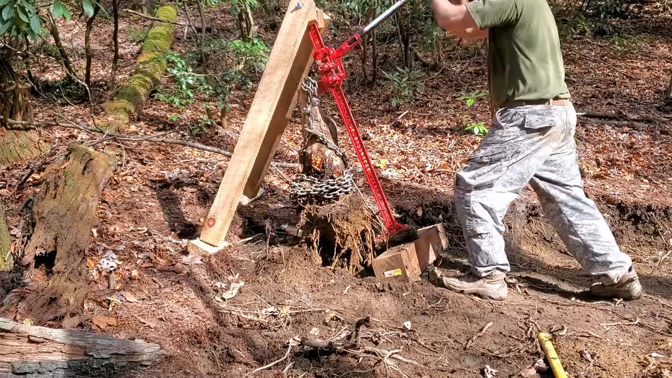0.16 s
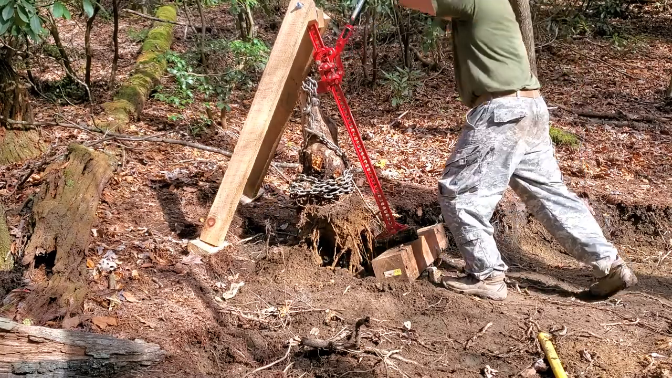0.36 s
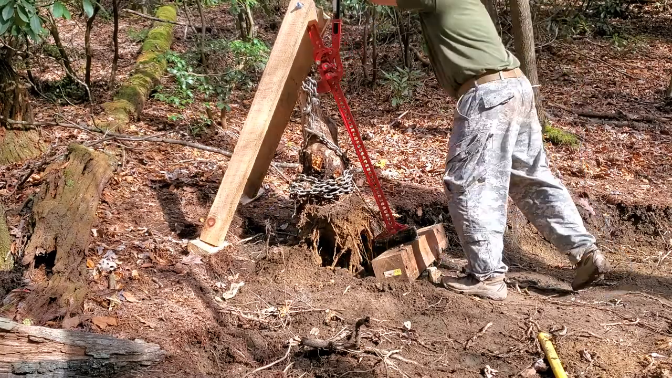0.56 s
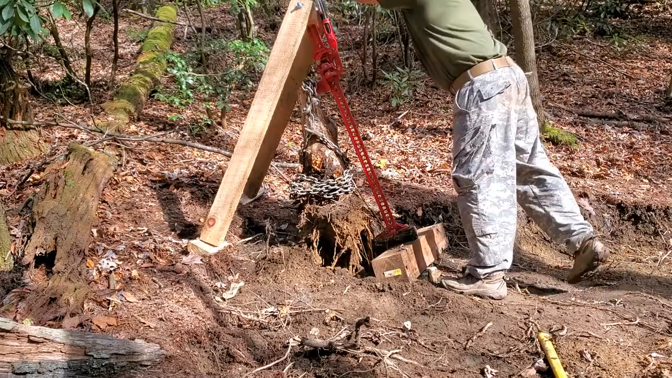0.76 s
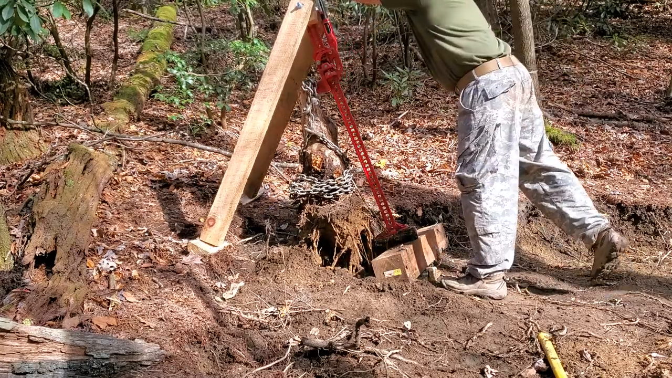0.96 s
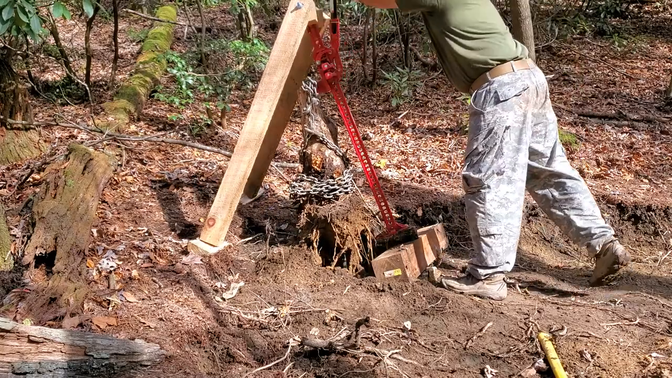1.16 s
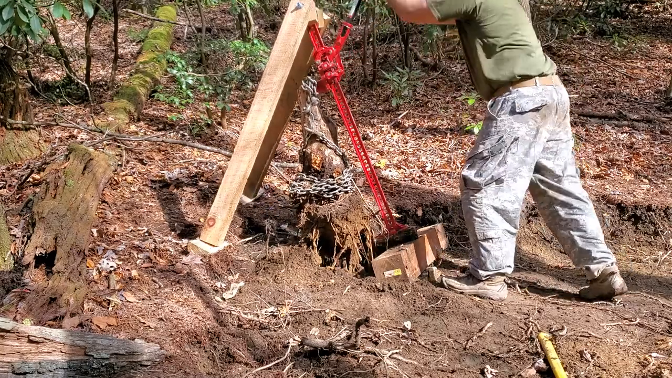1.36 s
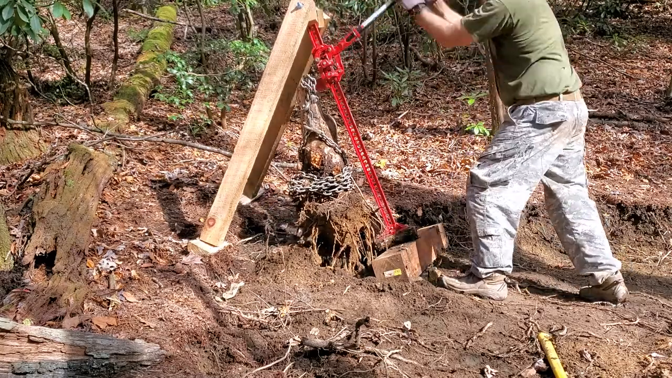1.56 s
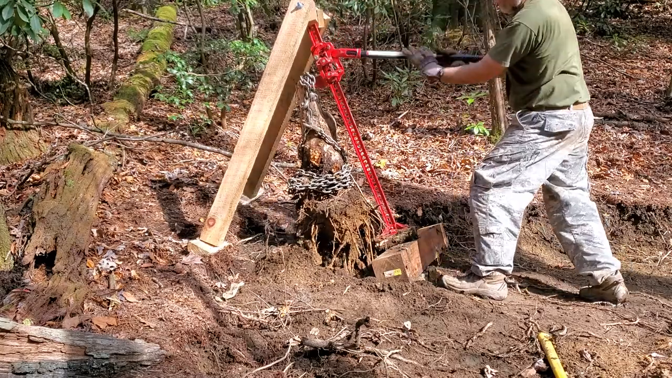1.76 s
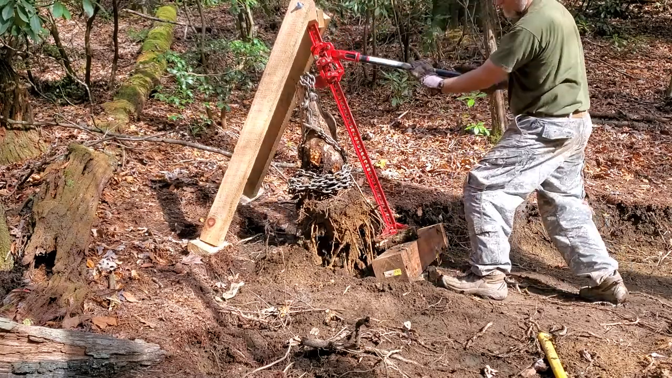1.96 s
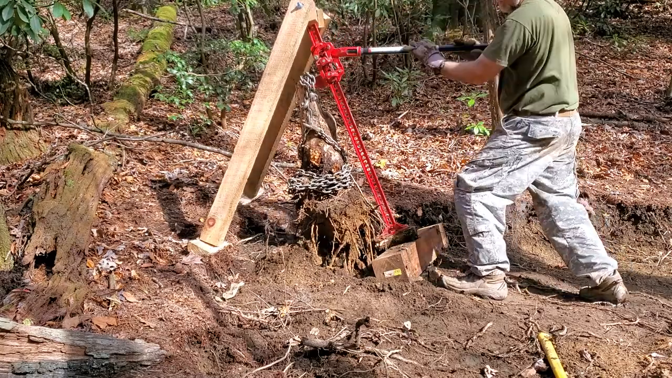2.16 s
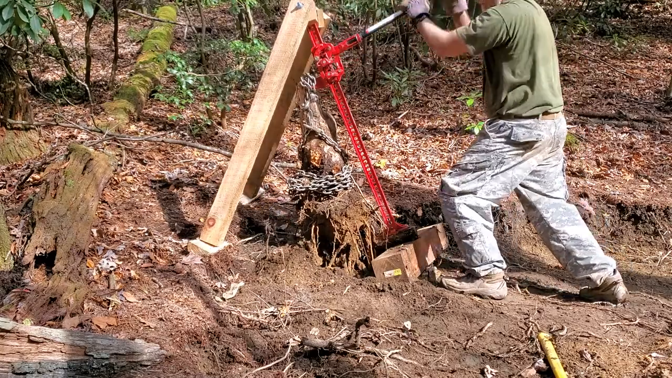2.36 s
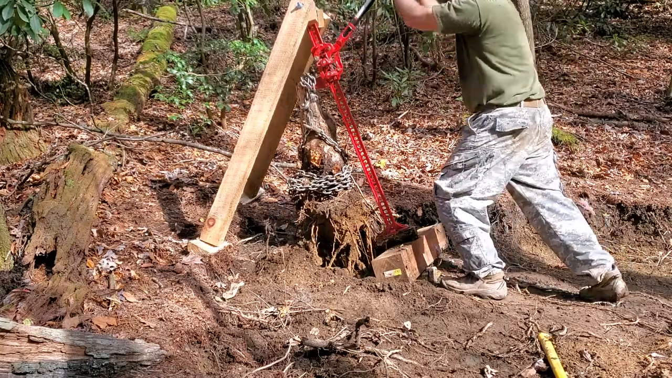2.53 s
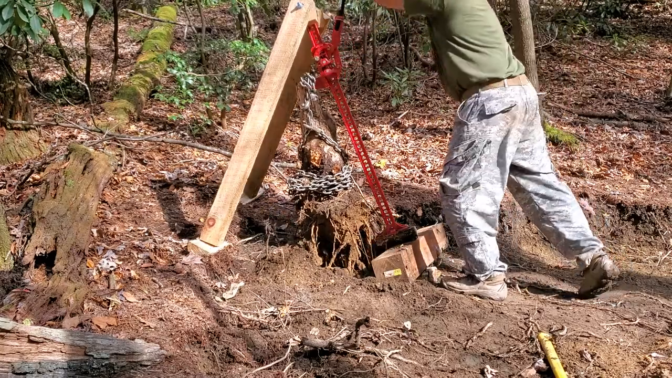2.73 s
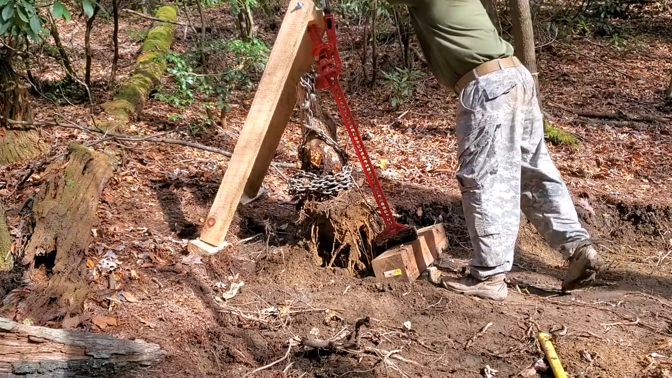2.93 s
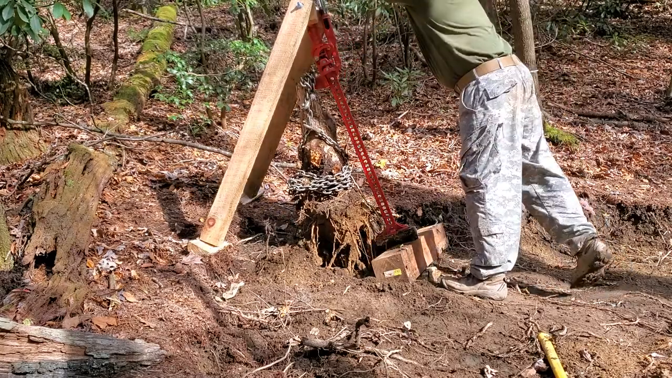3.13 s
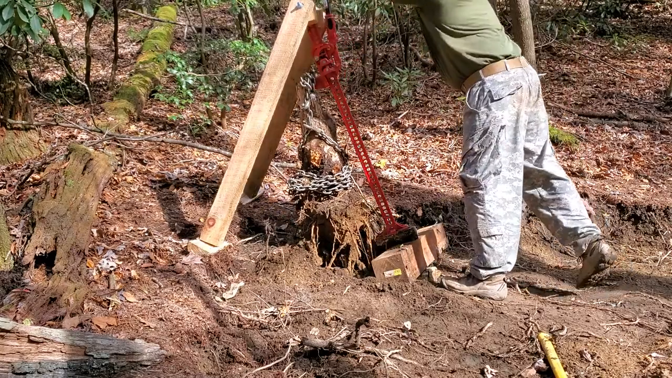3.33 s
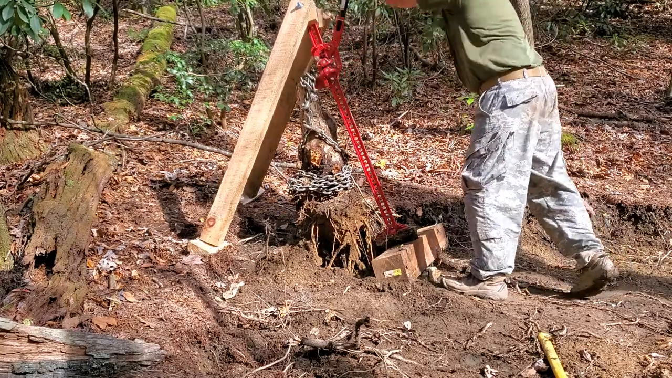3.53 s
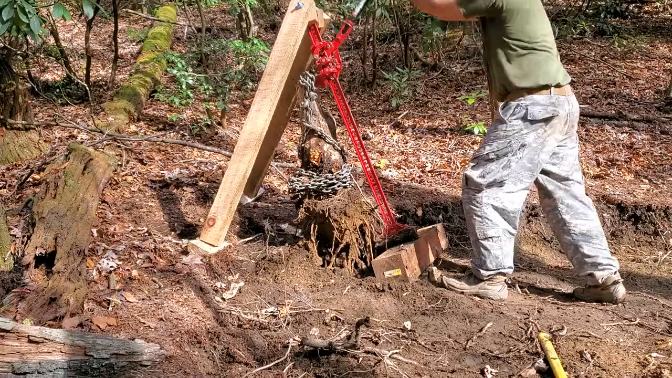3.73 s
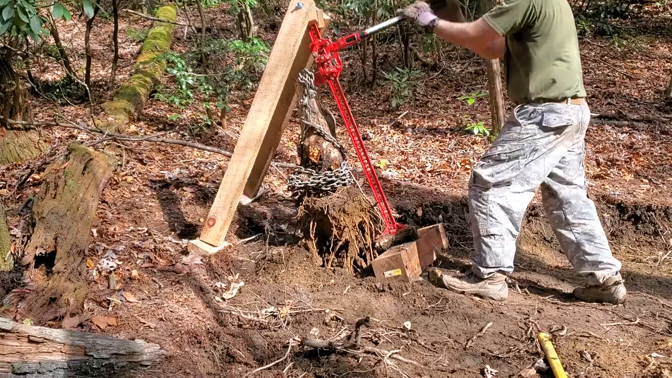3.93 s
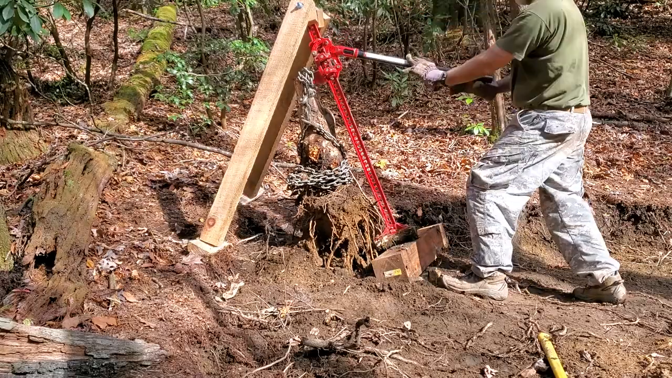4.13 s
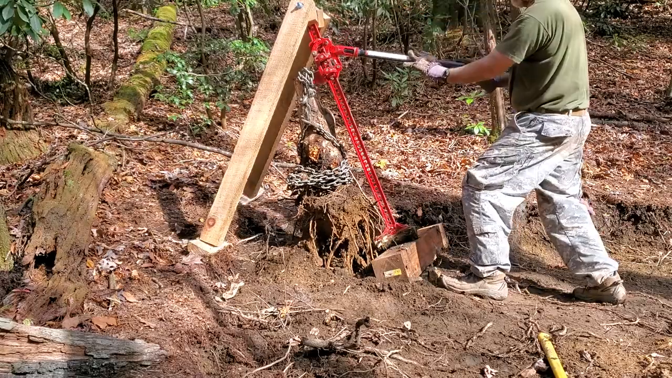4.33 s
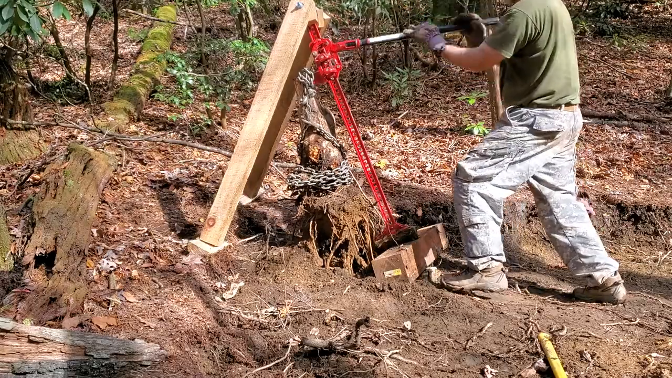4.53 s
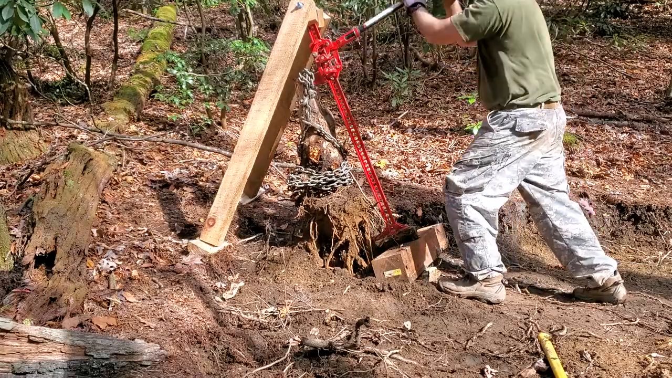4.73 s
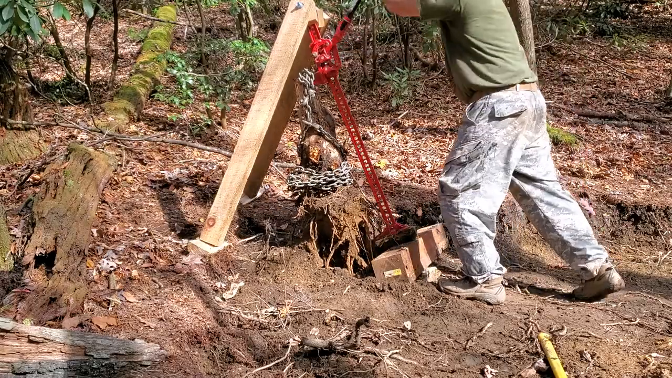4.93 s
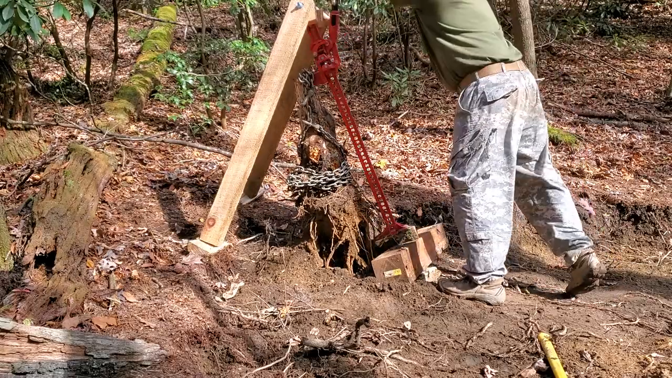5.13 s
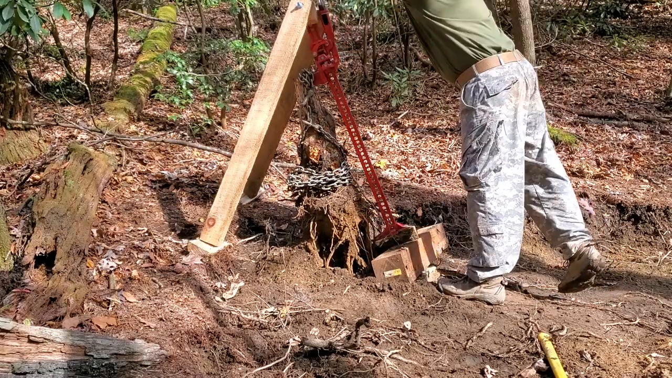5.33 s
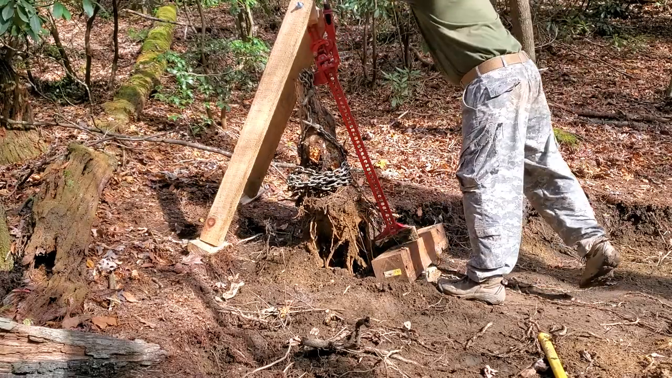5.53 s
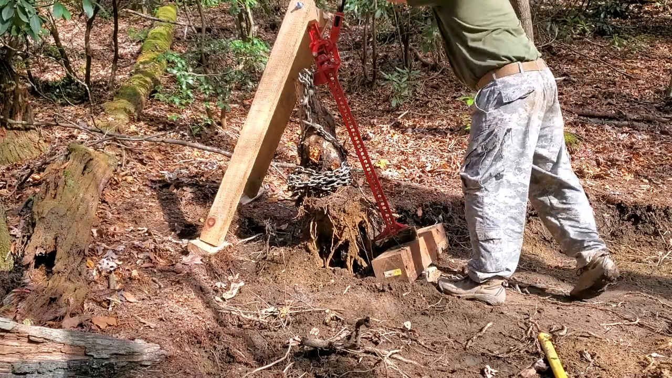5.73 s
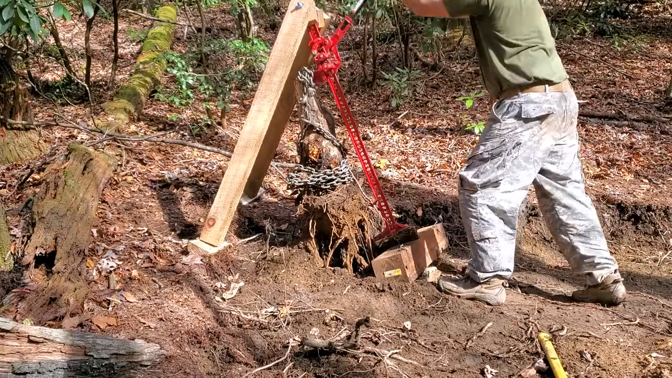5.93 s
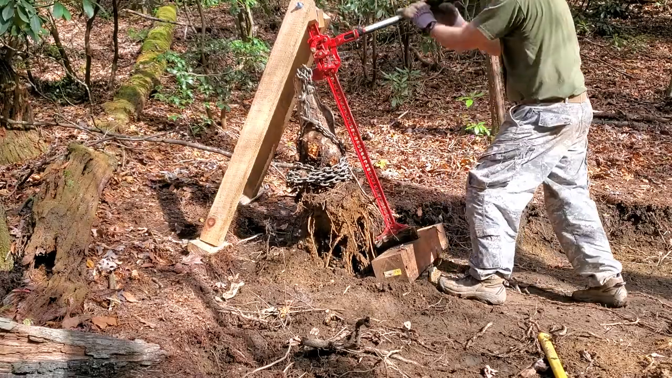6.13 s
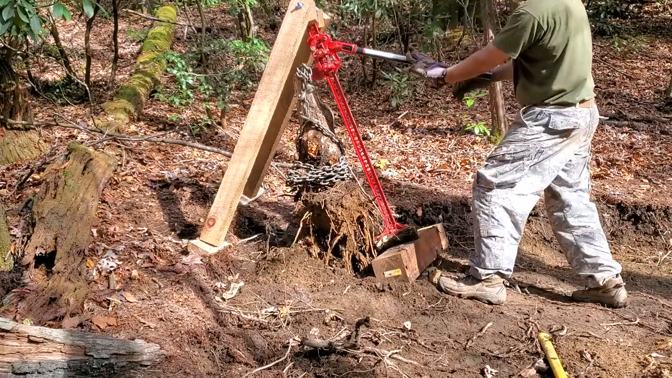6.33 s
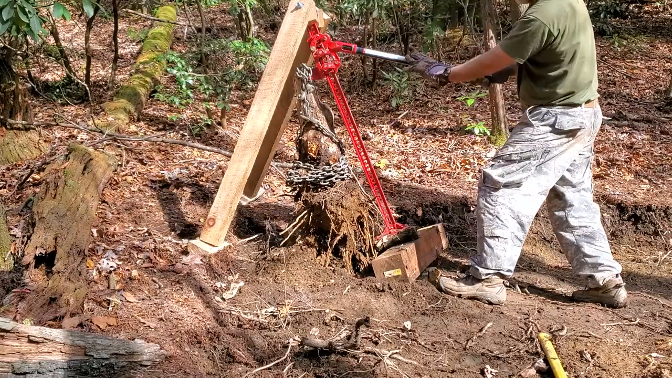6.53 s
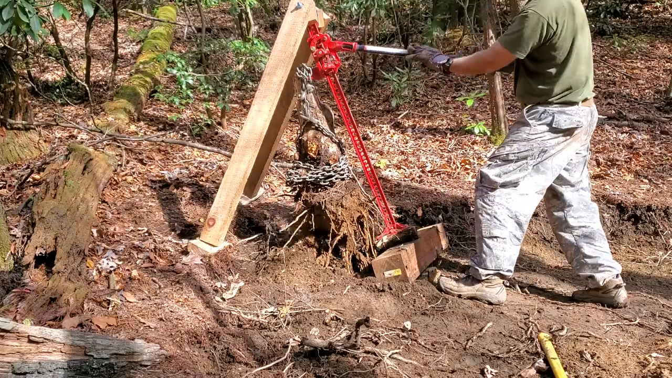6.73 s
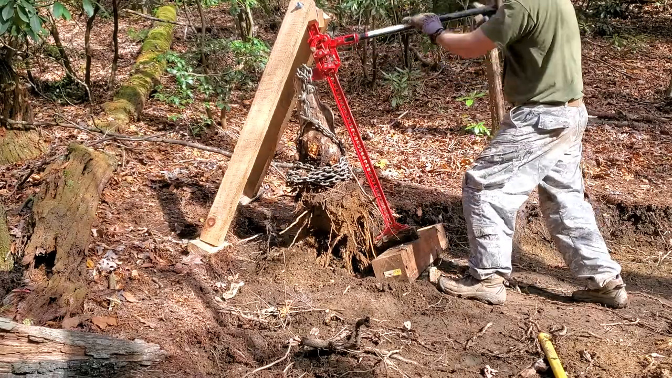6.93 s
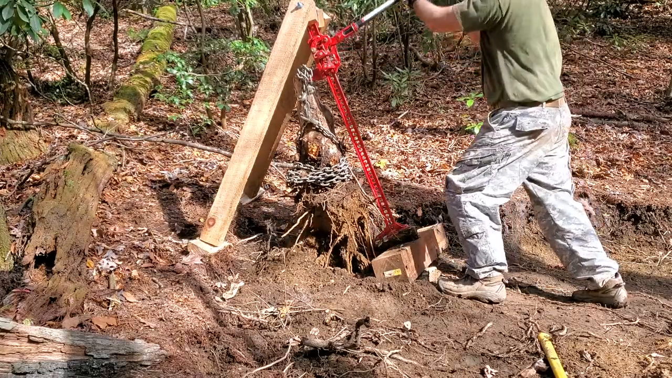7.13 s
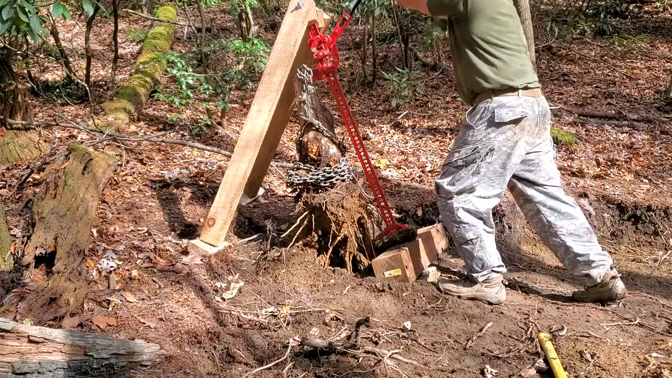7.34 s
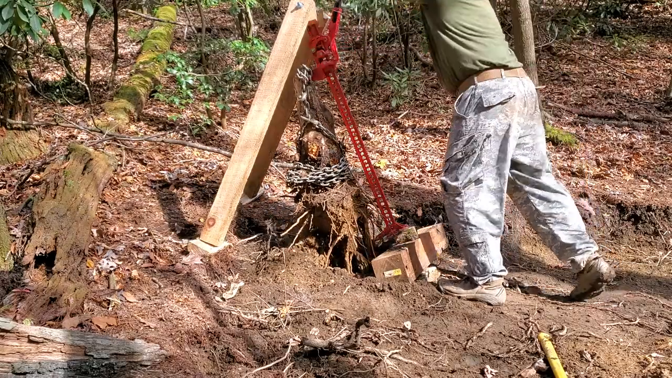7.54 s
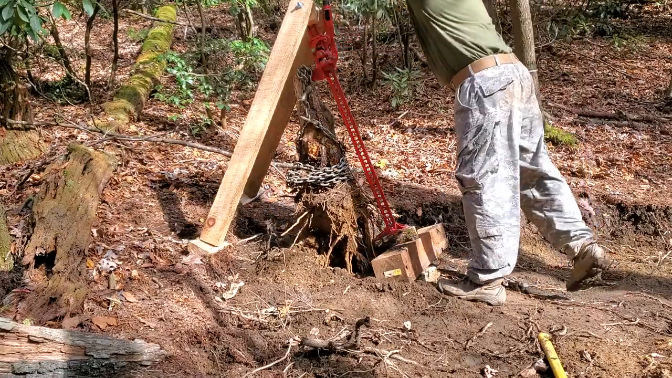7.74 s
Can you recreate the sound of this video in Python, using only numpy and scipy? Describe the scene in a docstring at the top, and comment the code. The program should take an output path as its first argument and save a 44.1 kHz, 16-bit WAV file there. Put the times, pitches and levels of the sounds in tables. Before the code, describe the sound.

A bright, dry steel snap opens the pumping, then a looser double knock of handle and housing, another snap, and so on, irregularly paced by the strokes. Small wooden creak-like taps and brief drags precede some clacks, and the ground bumps deeply under the heaviest ones. Close cricket song pulses at high pitch without stopping. Open woodland, soft airy background, blows leaning left, short diffuse reverberation.

```python
"""Farm jack under a timber frame

In a wood, a steel jack pulls a stump a few metres left of the camera microphones. Sprung pins snap into the bar,
handle and frame knock as the load shifts: noise bursts driving banks of steel and timber modes.
The ground thuds as low sways driven by noise; a cricket close by chirps in short falling tones.
Leaves hush behind as shaped noise, and the trunks scatter blows and chirps back as fading hiss."""
import sys
import numpy as np
from scipy import signal
from scipy.fft import rfft, irfft
from scipy.io import wavfile
from scipy.ndimage import uniform_filter1d

SR = 44100
rng = np.random.default_rng(int(sys.argv[2]) if len(sys.argv) > 2 else 0)


def unload_wav(signal):
    """Save mono or channel-first audio to the path in sys.argv[1] as 16-bit WAV at rate SR, clipped to [-1, 1]."""
    wavfile.write(
        sys.argv[1],
        SR,
        np.round(np.clip(np.atleast_2d(signal).T, -1, 1) * 32767).astype(np.int16),
    )


N = 347930

# Pins snapping home: start_s, pin (0 up stroke, 1 down stroke), brace_db, bright_db (shared among parts),
# lean_db (left minus right, scaled for each part)
PIN_SNAPS = [(0.648, 0, -27, -8, 3.5), (1.6978, 1, -30.5, 1.5, 6.5), (2.9164, 0, -29.5, -3, 4.5),
             (3.9638, 1, -33.5, 3.5, 7), (5.2418, 0, -29, 3, 4.5), (6.1423, 1, -27, 1, 5),
             (7.7634, 0, -29.5, 5.5, 4)]
# One row for each pin: beam_db, brace_db, bar_db, housing_db, pin_db (all over the brace level of the snap),
# rise_s, rattle_s, ring_db (over crack, scaled for each part)
SNAP_KINDS = [(-18, 0.1, 4.8, 7.8, 11, 0.0012, 0.01, -8), (-16.5, 0.1, 8.1, 11.2, 22, 0.003, 0.0047, 43)]
# The graze just before each snap: same columns as the snap kinds
GRAZE_KINDS = [(-12.5, -23, -2.5, 7.4, 12.5, 0.0021, 0.025, -10),
               (-40, -24, -6, 4, -15, 0.00086, .009, -11)]
# How much of bright_db each part takes, beam to pin: share
BRIGHT_SHARE = (0.01, 0.01, 0.58, 0.43, 0.86)
GRAZE_LEAD_S, GRAZE_LEAN_DB = (.0024, .0027), (4, 0)  # for each pin; the lean is added to that of the snap
BOUNCE_LAG_S, BOUNCE_DB = (.0083, .0096), (-18, -16)  # for each pin; level over the snap
# What the pins ring with, before scatter: pitch_hz, level_db, t60_s
BAR_MODES = [(867, -48, 0.12), (1134, -2, 0.028), (1473, -5.5, 0.00524), (1846, -9.5, 0.059),
             (3000, -16.5, 0.042), (3720, -26, 0.057), (4230, 0.5, 0.021), (5370, -10, 0.026),
             (6370, -2, 0.003), (7650, -8, 0.016), (8240, -9, 0.0076), (11700, -33, 0.03), (12500, -5, .02),
             (12790, 0, .025), (12980, -1, .02), (13200, -7, .02), (13200, -28, 0.019), (13700, -13, 0.018)]

# Handle and housing clacking as the load shifts: start_s, brace_db, beam_db (over brace), bar_db (over brace),
# step_db (bar to housing), rattle_s, ring_db (over crack, scaled for each part)
CLACKS = [(1.254, -42, -24, -3.5, 3.5, .027, -10), (1.304, -27, -5, -5, -1, 0.018, -8),
          (2.47, -23, -10.5, -2.5, 2.1, 0.057, -0.5), (2.499, -43, 6, 4.5, 0.5, 0.013, -9),
          (4.109, -35, -8, 14, -4, 0.02, -4), (4.121, -25.5, -5, -8.5, -14, 0.016, -10),
          (4.786, -29, -2, 1.5, 2, .03, -8), (4.791, -19, -14.5, -10.5, 2.7, 0.013, 4),
          (4.841, -47, 5, 9, -8, 0.0079, 2.5), (5.325, -30.5, -13.5, -6, -2.5, 0.028, -4),
          (6.288, -27, -2.5, -4, -6, 0.055, 1.5), (6.305, -22, -2.5, -7, -2.5, 0.017, 27),
          (6.31, -24.5, 1, -4.5, 0.5, 0.026, -27), (6.319, -32.5, -10, 0, 1.2, 0.1, 8),
          (7.29, -25.5, -11, -4.5, 1.6, 0.032, -5), (7.294, -26.5, -7.5, -14, 3.5, 0.029, 5),
          (7.837, -28.5, -9.5, -0.3, -3, 0.034, 0)]
CLACK_RISE_S, CLACK_LEAN_DB = .0031, 5
PIN_STEPS, PIN_DROP_DB = 2.7, -8.5  # the pin part lies this many steps from the bar, and this much lower still
# Timber frame tapping as it settles: start_s, level_db, beam_db (added to the beam alone)
FRAME_TAPS = [(0.089, -40.5, -8), (0.198, -43, -9), (0.407, -44.5, -3), (0.738, -40, 0.5),
              (1.165, -47, -17), (1.236, -42, -19), (2.356, -39, -1), (2.367, -41.5, -20), (2.575, -41, -7),
              (2.632, -37, -6.5), (3.554, -39.5, -1), (3.712, -44.5, 0), (4.951, -45, -5),
              (4.982, -39.5, -3.5), (5.699, -39.5, -19), (5.75, -37, -5.5), (5.762, -41, -0.5),
              (7.11, -42.5, -4.5), (7.411, -42, 4)]
# Chain links ticking: start_s, level_db
CHAIN_TICKS = [(1.478, -39.5), (3.725, -41.5), (5.904, -43), (6.683, -49)]
# The handle dragging into a clack: start_s, level_db
HANDLE_SCRAPES = [(1.185, -46), (1.274, -40), (1.29, -34), (2.458, -30.5), (3.545, -42.5), (4.777, -29.5),
                  (5.717, -43), (7.278, -32.5)]
# Colour of a tap: beam_db, brace_db, bar_db, housing_db, pin_db (over the event level), rise_s, rattle_s,
# ring_db (over crack, scaled for each part), lean_db (left minus right, scaled for each part);
# negative times stand for the shortest that blows() allows
TAP_KIND = (-2.5, -0.5, -10.5, -18, -21, -0.03, -0.03, -4, 3)
# Colour of a chain tick: same columns as the tap
TICK_KIND = (-19, -6, 0, -18, -20, .002, .016, 7, 6)
# Colour of a scrape: same columns as the tap
SCRAPE_KIND = (-12, 0, -11, -17, -26, .025, .055, 2, 4.5)
# What the knocks ring with, before scatter: pitch_hz, level_db, t60_s
FRAME_MODES = [(282, -31.5, 0.15), (562, 4.5, 0.13), (684, -18, 0.027), (899.6, 12, 0.031),
               (1063, 10.5, 0.015), (1203, 11.5, 0.029), (1450, 3.5, 0.0094), (1794, 6, 0.0083),
               (2880, 0, .05), (4110, -1, .04), (4460, -6, .02), (6210, 7.5, 0.023), (6130, -1, 0.0076),
               (6860, 4, 0.018), (8840, -1, 0.009), (10170, -24, .03), (12150, 14.5, 0.013),
               (13500, -20.5, .03)]

# Band limits of the five parts beam, brace, bar, housing, pin: edge_hz
PART_EDGES_HZ = (250, 900, 2400, 5200, 10500, 16500)
# The camera body shades treble most, so higher parts lean further: factor on lean_db, beam to pin
PART_LEAN = (.5, .75, 1.0, 1.05, 1.3)
MODE_SCATTER, SPOT_DB = .005, 2  # each blow shifts the modes by this share and varies their strength

# Stump and boots shaking the ground: start_s, peak_db
GROUND_THUDS = [(0.107, -53.5), (0.395, -59), (0.749, -54), (1.298, -42.5), (1.716, -62), (2.376, -51),
                (2.469, -52), (2.629, -60), (3.04, -55), (3.555, -50), (4.121, -36.5), (4.617, -57),
                (4.737, -51), (4.802, -47.5), (4.871, -59), (5, -60), (5.369, -59), (5.764, -51),
                (6.293, -32), (6.337, -40.5), (7.085, -50.5), (7.307, -56.5), (7.798, -52)]
GROUND_HZ, GROUND_T60_S = 67.5, .36  # main sway pitch, and the time that push and sways take fractions of

# Chirps longer, shorter or off the pace of the even pairs: start_s, wing strokes
ODD_CHIRPS = [(0.207, 3), (0.298, 3), (0.516, 3), (0.614, 2), (0.697, 1), (0.804, 3), (0.964, 3),
              (1.184, 2), (1.375, 3), (1.528, 3), (1.817, 2), (2.2, 2), (2.44, 3), (2.542, 2), (2.598, 1),
              (2.63, 1), (2.796, 3), (2.884, 2), (2.97, 1), (3.005, 2), (3.771, 3), (4.052, 2), (4.147, 2),
              (4.214, 3), (4.373, 3), (4.464, 3), (4.55, 2), (4.675, 3), (4.77, 3), (4.92, 3), (5.267, 3),
              (5.354, 2), (5.482, 3), (5.578, 3), (5.661, 2), (5.732, 3), (5.823, 3), (6.038, 3),
              (6.129, 3), (6.274, 2), (6.357, 1), (6.469, 4), (6.585, 4), (6.821, 3), (7.027, 1),
              (7.069, 3), (7.161, 3), (7.252, 3), (7.775, 2), (7.86, 1)]
# Song level over time, before stroke scatter: time_s, level_db
SONG_LEVEL = [(0, -49.5), (.55, -49), (.85, -46.5), (1.7, -47.5), (2.0, -48), (2.8, -49), (3.5, -46),
              (4.1, -47), (4.45, -50), (5.4, -46.5), (6.5, -47), (7.5, -46.5)]
# Echoes from nearby wood and soil, every other one with the ears swapped: lag_s, level_db
CRICKET_ECHOES = [(.0075, -52), (.012, -22), (.0145, -23), (.0165, -18)]
SONG_START_S, SONG_END_S = .012, 7.9
PAIR_PERIOD_S, PAIR_JITTER_S = .063, .002  # the period stretches a little to fit between odd chirps
REST_S = (.018, .025)  # pause after a chirp of up to two strokes, and after a longer one
STROKE_S, STROKE_GAP_S, STROKE_LEAD_S = .0062, .0221, .0012  # length, start to start, delay of the first
STROKE_HZ = (6850, 5850)  # start and end of the fall, before scatter

# Colour of the background, before overall levelling: pitch_hz, level_db (per Hz)
HUSH_SPECTRUM = [(30, -22), (82, -11.5), (200, -21), (340, -11), (506, -3), (1800, -8), (4000, -15.5),
                 (5500, -19), (6400, -13.5), (7600, -23), (10500, -26.5), (12300, -16), (14500, -31.5),
                 (16300, -39)]
# Likeness of left and right in the background: pitch_hz, likeness (-1 to 1)
HUSH_ALIKE = [(60, 0.71), (300, 0.81), (640, 0.29), (1400, -0.28), (3100, 0.064), (15000, -0.28)]
# Lean of the background: pitch_hz, lean_db (left minus right)
HUSH_LEAN = [(60, -3), (300, 0.5), (1300, 3.5), (4400, 6.5), (8000, -1), (15000, 4)]
HUSH_DB = -54  # rms over both channels

WOOD_T60_S = .3  # scatter of the blows
TOP_HZ, CEILING = 16400, .8  # recorder cutoff, and the level its peaks bend towards


def amp(db):
    """Decibels to gain."""
    return 10 ** (np.asarray(db) / 20)


def fade(n, t60):
    """A decay of 60 dB in t60 seconds."""
    return np.exp(-np.log(1000) * np.arange(n) / SR / t60)


def ring(x, hz, t60):
    """One mode driven by x: a two-pole resonator with gain near 1 at its peak."""
    radius = np.exp(-np.log(1000) / (t60 * SR))
    angle = 2 * np.pi * hz / SR
    feedback = [1, -2 * radius * np.cos(angle), radius * radius]
    return signal.lfilter([2 * (1 - radius) * np.sin(angle)], feedback, x)


def band(x, lo_hz, hi_hz):
    """Steep band-pass."""
    edges = [lo_hz, min(hi_hz, .45 * SR)]
    return signal.sosfilt(signal.butter(3, edges, "bandpass", fs=SR, output="sos"), x)


def on_log_hz(table, hz):
    """A spectrum table read at hz, interpolated over log frequency."""
    at, value = np.transpose(table)
    return np.interp(np.log(np.maximum(hz, 1)), np.log(at), value)


def walk(rate):
    """Random levels held 1 / rate s and slewed twice; spread near 1."""
    k = int(SR / rate)
    steps = np.repeat(rng.standard_normal(N // k + 1), k)
    smooth = uniform_filter1d(uniform_filter1d(steps, k), k)
    return np.sqrt(20 / 11) * smooth[:N]


def add(out, s, sound, pan_db):
    """Mix a sound in at time s, leaning left by pan_db."""
    i = int(s * SR)
    sound = sound[..., :N - i]
    out[:, i:i + sound.shape[-1]] += amp([[pan_db / 2], [-pan_db / 2]]) * sound


def pin_snaps():
    """Steel pins strike the bar and set its modes ringing."""
    # tuples run beam, brace, bar, housing, pin
    return blows(snap_rows(), BAR_MODES, crack_db=-22.0, grit_db=2.0, unlike=.78,
                 shiver_db=(-10.0, 2.0, -10, -10.5, -30.5), shiver_s=(.0704, .092, .17, .17, .22),
                 sing_db=(-3, -2.5, -22.5, -19.5, -2.5), free=(.31, .3, .22, .26, 1))


def snap_rows():
    """Each pin grazes the bar, snaps home under its spring and bounces once."""
    rows = []
    for s, pin, db, bright_db, lean_db in PIN_SNAPS:
        pin = round(pin)
        level = db + bright_db * np.array(BRIGHT_SHARE)
        graze, snap = GRAZE_KINDS[pin], SNAP_KINDS[pin]
        graze_lean_db = lean_db + GRAZE_LEAN_DB[pin]
        rows.append((s - GRAZE_LEAD_S[pin], *(level + graze[:5]), *graze[5:], graze_lean_db))
        rows.append((s, *(level + snap[:5]), *snap[5:], lean_db))
        bounce_level = level + snap[:5] + BOUNCE_DB[pin]
        rows.append((s + BOUNCE_LAG_S[pin], *bounce_level, *snap[5:], lean_db))
    return rows


def frame_knocks():
    """Handle, housing, chain and timber knock and ring with the frame modes."""
    # tuples run beam, brace, bar, housing, pin
    return blows(knock_rows(), FRAME_MODES, crack_db=-6.0, grit_db=5.5, unlike=.49,
                 shiver_db=(-7.5, -7.5, -13, -11, -20.0), shiver_s=(.15, .077, .048, .083, .08),
                 sing_db=(-9.5, -2, -7, -1, 5), free=(.44, .34, 2.8, .71, .8))


def knock_rows():
    """Clacks bring their own colour; taps, ticks and scrapes share that of their kind."""
    rows = []
    for kind, table in ((TAP_KIND, FRAME_TAPS), (TICK_KIND, CHAIN_TICKS), (SCRAPE_KIND, HANDLE_SCRAPES)):
        for s, db, *beam_db in table:  # only taps have a beam column
            beam = db + sum(beam_db) + kind[0]
            rows.append((s, beam, *(db + np.array(kind[1:5])), *kind[5:]))
    for s, db, beam_db, bar_db, step_db, rattle_s, ring_db in CLACKS:
        bar = db + bar_db
        pin = bar + PIN_STEPS * step_db + PIN_DROP_DB
        parts_db = (db + beam_db, db, bar, bar + step_db, pin)
        rows.append((s, *parts_db, CLACK_RISE_S, rattle_s, ring_db, CLACK_LEAN_DB))
    return rows


def blows(table, modes, crack_db, shiver_db, shiver_s, grit_db, unlike, free, sing_db):
    """Each blow is a gritty burst of contacts and a dying shiver; every part answers with modes and a dry crack."""
    out, n = np.zeros((2, N)), SR // 4
    for s, *parts_db, rise_s, rattle_s, ring_db, lean_db in table:
        grit = amp(grit_db * uniform_filter1d(rng.standard_normal(n), size=24) * np.sqrt(24))
        shared, *own = rng.standard_normal((3, n))
        # a large frame reaches each ear a little differently
        chatter = (shared + unlike * np.array(own)) * grit
        chatter *= 1 - fade(n, max(rise_s, 1 / SR))
        burst = chatter * fade(n, max(rattle_s, .001))
        spot, shift = rng.standard_normal((2, len(modes)))
        for k, db in enumerate(parts_db):
            lo, hi = PART_EDGES_HZ[k:k + 2]
            shiver = chatter * amp(shiver_db[k]) * fade(n, shiver_s[k])
            part = amp(crack_db) * (burst + shiver)
            # the shiver drives the modes at its own gain
            contacts = burst + amp(sing_db[k]) * shiver
            for (hz, mode_db, t60), strength, detune in zip(modes, spot, shift):
                if lo <= hz < hi:
                    gain = amp(mode_db + free[k] * ring_db + SPOT_DB * strength)
                    part = part + gain * ring(contacts, hz * (1 + MODE_SCATTER * detune), t60)
            part = band(part, .9 * lo, hi)
            # level each part by twice its loudest short-time rms
            power = uniform_filter1d(np.mean(part ** 2, axis=0), size=128)
            peak = 2 * np.sqrt(power.max())
            add(out, s, amp(db) * part / peak, PART_LEAN[k] * lean_db)
    return out


def ground_thuds():
    """A soft noisy push sets three low ground modes swaying; loose soil roughens the sway."""
    out, n = np.zeros((2, N)), SR // 2
    hz, t60 = GROUND_HZ, GROUND_T60_S
    for s, peak_db in GROUND_THUDS:
        push = rng.standard_normal((2, n)) * fade(n, .5 * t60) * (1 - fade(n, .02))
        # mostly common to both ears, a little opposed
        push = push[0] + .148 * push[1] * np.array([[1], [-1]])
        sway = ring(push, hz, .7 * t60)
        sway = sway + amp(-6) * ring(push, .72 * hz, .6 * t60)
        sway = sway + amp(-13) * ring(push, 1.64 * hz, .2 * t60)
        sway = band(sway, 34, 134)
        add(out, s, amp(peak_db) * sway / np.abs(sway).max(), 0)
    return out


def cricket():
    """Each wing stroke is a falling tone with a faint octave; nearby wood and soil return short echoes."""
    out, t = np.zeros((2, N)), np.arange(int(STROKE_S * SR)) / SR
    shape = np.sin(np.pi * (t / STROKE_S) ** .75) ** .7
    # each stroke's level throbs 430 times a second
    shape = shape * (1 - .22 * np.cos(2 * np.pi * 430 * t))
    fall_hz = np.linspace(*STROKE_HZ, len(t))
    for s, strokes in chirp_rows():
        db = np.interp(s, *np.transpose(SONG_LEVEL))
        for k in range(strokes):
            late, pitch, size, lean = rng.standard_normal(4)
            phase = 2 * np.pi * np.cumsum(fall_hz) * (1 + .006 * pitch) / SR
            tone = shape * (np.sin(phase) + amp(-21) * np.sin(2 * phase))
            start = s + STROKE_LEAD_S + k * STROKE_GAP_S + .00051 * late
            add(out, start, amp(db + 2.2 * size) * tone, 1.3 + 1.1 * lean)
    echoes = np.zeros((2, N))
    for k, (lag_s, db) in enumerate(CRICKET_ECHOES):
        ears = out[::(-1) ** k]
        echoes += amp(db) * np.roll(ears, int(lag_s * SR), axis=1)
    return out + echoes


def chirp_rows():
    """Pairs of strokes fill the time between the odd chirps at a nearly even pace."""
    rows, start = [], SONG_START_S
    for s, strokes in ODD_CHIRPS + [(SONG_END_S, 0)]:
        strokes = round(strokes)
        pairs = max(round((s - start) / PAIR_PERIOD_S), 0)
        for at in np.linspace(start, s, pairs, endpoint=False):
            rows.append((at + PAIR_JITTER_S * rng.standard_normal(), 2))
        rows.append((s, strokes))
        start = s + strokes * STROKE_GAP_S + REST_S[strokes > 2]
    return rows


def trunks(x, t60, db, lo_hz):
    """Scattered returns from trunks and bank: a fading hiss, unlike in the two ears."""
    n = int(SR * .6)
    rise = 1 - fade(n, .019)
    tail = band(rng.standard_normal((2, n)), lo_hz, 15600) * fade(n, t60) * rise
    tail = tail / np.sqrt(np.sum(tail ** 2, axis=1, keepdims=True))
    return amp(db) * signal.fftconvolve(x, tail, axes=1)[:, :N]


def hush():
    """Leaves, far insects and microphone hiss: shaped noise whose octaves swell together and flicker alone."""
    hz = np.fft.rfftfreq(N, 1 / SR)
    alike = np.clip(on_log_hz(HUSH_ALIKE, hz), -1, 1)
    mid, side = rfft(rng.standard_normal((2, N))) * np.sqrt([1 + alike, 1 - alike])
    lean = on_log_hz(HUSH_LEAN, hz) / 2
    ears = np.array([(mid + side) * amp(lean), (mid - side) * amp(-lean)])
    ears = ears * amp(on_log_hz(HUSH_SPECTRUM, hz))
    out, swell_db = 0, walk(.52)
    for octave in range(5, 15):  # centred on 2 ** octave Hz, overlapping as triangles
        share = np.clip(1 - np.abs(np.log2(np.maximum(hz, 1)) - octave), 0, 1)
        gusty_db = 4.0 if octave < 8 else .8  # the bass heaves far more than the hiss
        out = out + irfft(ears * share, N) * amp(1.0 * swell_db + gusty_db * walk(6.0))
    return out * amp(HUSH_DB) / np.std(out)


def scene():
    """All sources, with the blows and the cricket scattered by the wood."""
    pins = pin_snaps()
    frame = frame_knocks()
    song = cricket()
    near = pins + frame + ground_thuds() + song
    scattered = trunks(pins, WOOD_T60_S, -16.5, 600) + trunks(frame, WOOD_T60_S, -12.5, 370)
    scattered = scattered + trunks(song, .068, -8, 2200)
    return near + scattered + hush()


def record(dry):
    """The recorder rounds the loudest peaks and cuts the top."""
    rounded = CEILING * np.tanh(dry / CEILING)
    return signal.sosfilt(signal.ellip(8, .2, 70, TOP_HZ, fs=SR, output="sos"), rounded)


dry = scene()
out = record(dry)
unload_wav(out)
```